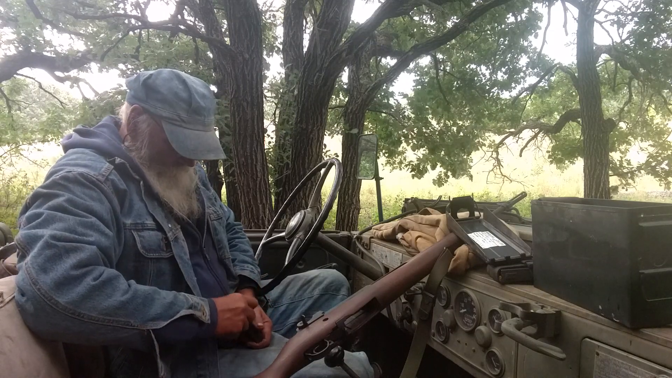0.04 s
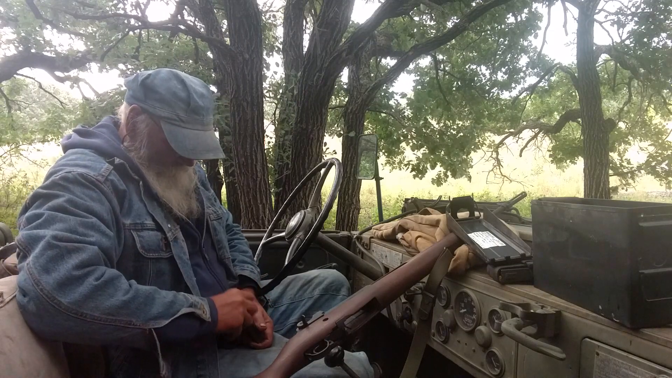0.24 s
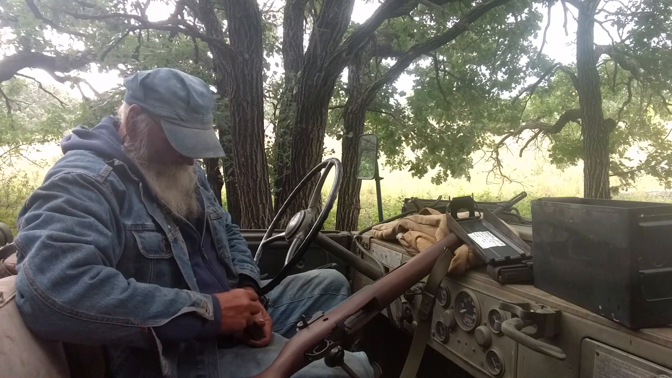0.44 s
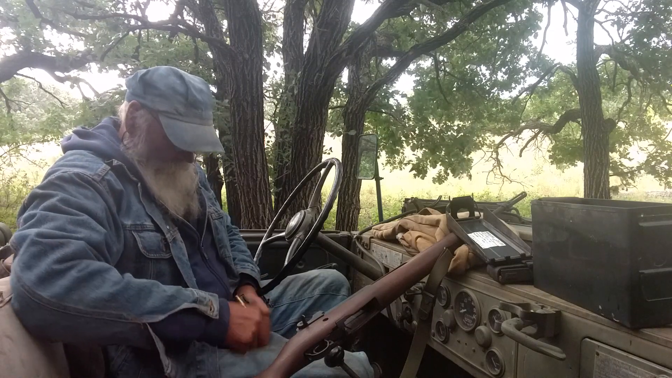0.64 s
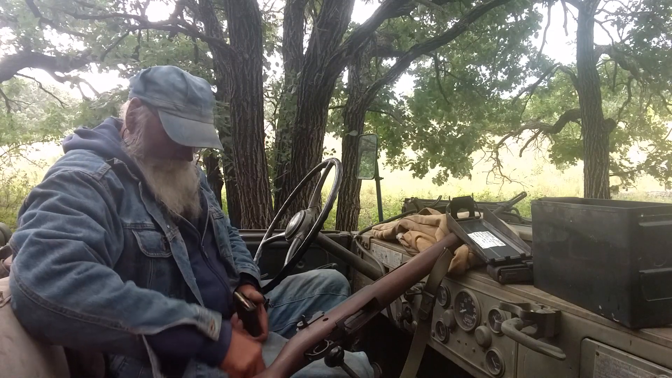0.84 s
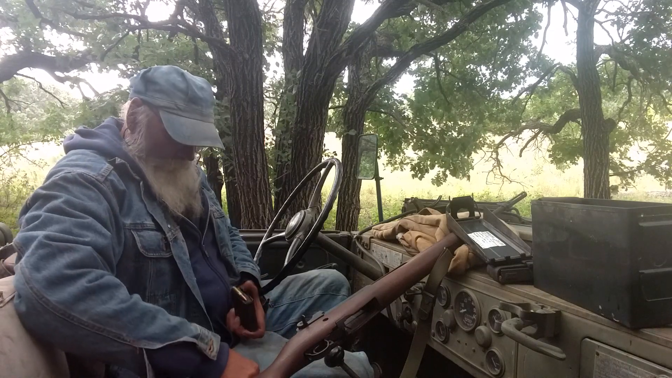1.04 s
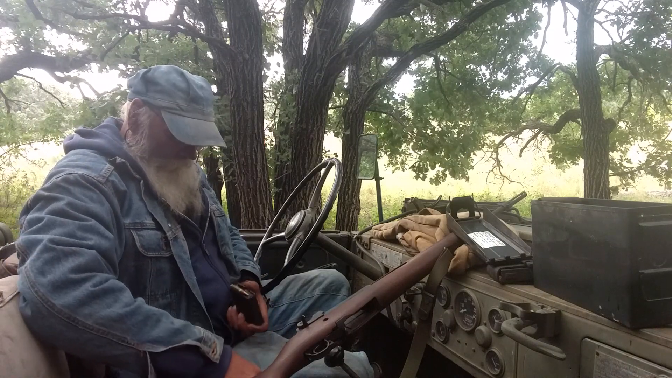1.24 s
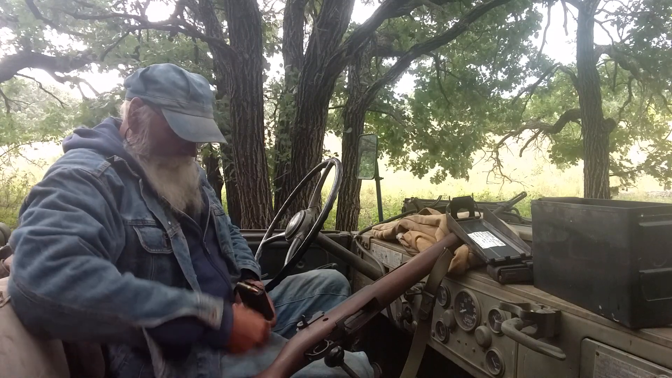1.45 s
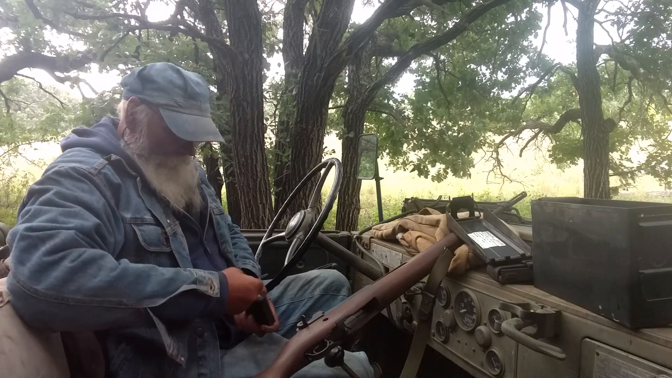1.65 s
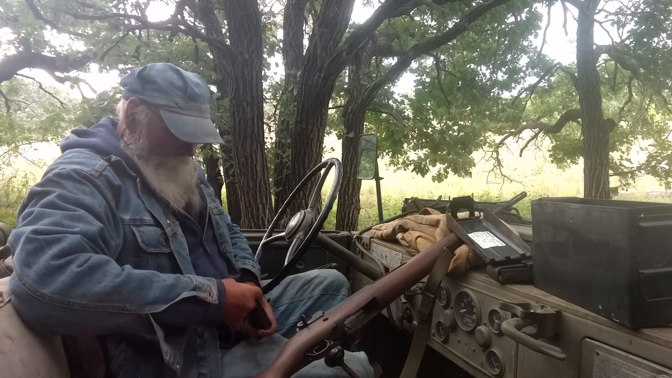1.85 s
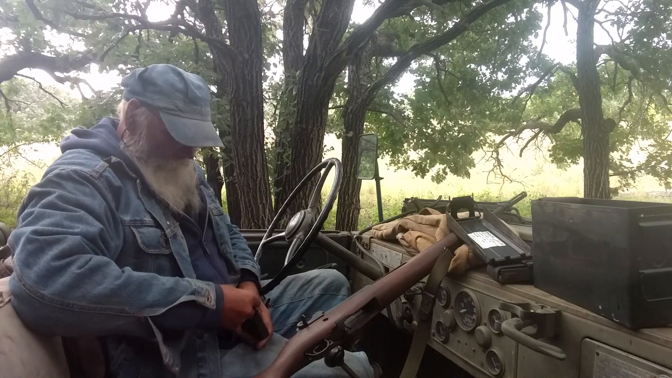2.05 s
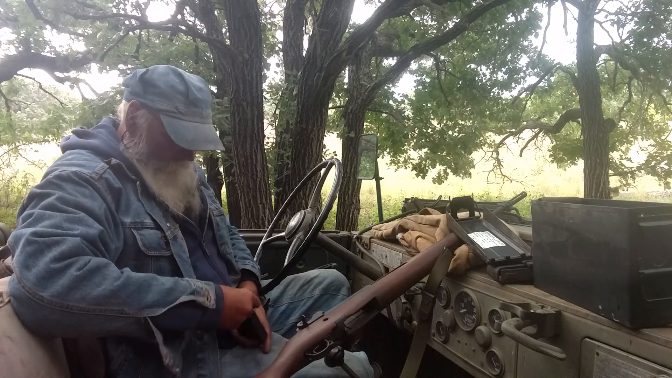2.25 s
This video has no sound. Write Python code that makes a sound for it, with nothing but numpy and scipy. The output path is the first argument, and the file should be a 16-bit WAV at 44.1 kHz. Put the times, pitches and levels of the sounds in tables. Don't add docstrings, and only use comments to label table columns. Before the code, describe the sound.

Cartridge snaps loudly into a steel magazine, then small metallic clicks, over faint outdoor wind hiss

```python
import sys
import numpy as np
from scipy import signal
from scipy.fft import rfft, irfft, next_fast_len
from scipy.io import wavfile
from scipy.ndimage import uniform_filter1d, map_coordinates

SR = 44100
rng = np.random.default_rng(int(sys.argv[2]) if len(sys.argv) > 2 else 0)


def log_audio(samples):
    frames = np.atleast_2d(samples).T
    limited = np.clip(frames, -1, 1)
    pcm = np.round(limited * 32767).astype(np.int16)
    wavfile.write(sys.argv[1], SR, pcm)


def invert_db(level):
    return 10 ** (np.asarray(level, dtype=float) / 20)


N = 101430


def unit(x):
    return x / np.sqrt(np.mean(x ** 2) + 1e-20)


def along(points, hz):
    f, v = np.transpose(points)
    return np.interp(np.log(hz + 1), np.log(f + 1), v)


def wobble(rate):
    knots = rng.standard_normal(int(N * rate / SR) + 4)
    return map_coordinates(knots, [np.arange(N) * rate / SR])


def filtered(x, response):
    n = x.shape[-1]
    m = next_fast_len(n + 8192)
    return irfft(rfft(x, m) * response(np.fft.rfftfreq(m, 1 / SR)), m)[..., :n]


def leaves():
    # frequency in Hz, level in dB.
    mid_tone = [(40, -13), (150, -0.5), (300, -1), (700, -7), (1800, -15.5), (4500, -14), (9000, -22.5),
                (14500, -34.5)]
    side_tone = [(40, -16), (100, -12.5), (300, -10.5), (1000, -14), (2000, -13), (4500, -15), (9000, -22),
                 (14500, -34.5)]
    hiss_top_hz, patchy_db = 15000, 0.52

    def response(hz):
        tone = invert_db(np.array([along(mid_tone, hz), along(side_tone, hz)]))
        return tone / (1 + (hz / hiss_top_hz) ** 40)

    z = signal.stft(rng.standard_normal((2, N)), nperseg=512)[2]
    patches = uniform_filter1d(rng.standard_normal(z.shape[1:]), size=6, axis=0)
    patches = unit(uniform_filter1d(patches, size=14, axis=1))
    pair = signal.istft(z * invert_db(patchy_db * patches), nperseg=512)[1][:, :N]
    mid, side = filtered(pair, response)
    return unit(np.array([mid + side, mid - side]))


def buffeting():
    # frequency in Hz, level in dB.
    rumble_tone = [(25, -16), (60, -13.5), (110, -2), (200, -11), (400, -30)]
    lumpy_db = 3.5
    noise = rng.standard_normal((2, N))
    rumble = filtered(noise, lambda hz: invert_db(along(rumble_tone + [(2000, -120)], hz)))
    lumps = np.array([wobble(8.62), wobble(27)])
    return unit(rumble * invert_db(lumpy_db * lumps))


def wind():
    # time in seconds, level in dB.
    gain_curve = [(0.0, -55.5), (0.15, -52), (0.3, -58), (0.52, -56), (1.2, -50), (1.74, -50.5), (2.3, -50)]
    leaves_db, buffet_db = 6.5, -3
    s, db = np.transpose(gain_curve)
    gain = invert_db(np.interp(np.arange(N) / SR, s, db))
    hiss = leaves()
    return gain * (invert_db(leaves_db) * hiss + invert_db(buffet_db) * buffeting())


def strike(modes, t, force):
    # frequency in Hz, level in dB.
    crack_tone = [(600, 1), (1500, 1.5), (4000, 6), (9000, -3.5), (13500, -15.5), (15000, -16),
                  (16500, -55)]
    sag_per_s, steel_damp_s = 4, 0.012
    crack_t60_s, crack_rise_s = 0.02, 0.0001
    peak_db, rise, finger_damp_s, crack_db, tilt_db = force
    side = np.array([[.5], [-.5]])

    ring = 0
    for hz, level, t60, pan in modes:
        damp_s = finger_damp_s if hz < 1200 else steel_damp_s
        decay = invert_db(level + side * pan - 60 * t / t60) * np.exp(-(t / damp_s) ** 2)
        sag = 1 - sag_per_s * t * (hz < 1000)
        phase = (hz > 1200) * rng.uniform(0, 2 * np.pi)
        ring = ring + decay * np.sin(2 * np.pi * hz * t * sag + phase)

    def crack_response(hz):
        return invert_db(along(crack_tone, hz) + tilt_db * np.log2((hz + 1) / 4000))

    swell = (1 - np.exp(-t / rise)) ** 2
    late = np.maximum(t - rise / 2, 0)
    crack = (1 - np.exp(-late / crack_rise_s)) * invert_db(crack_db - 60 * late / crack_t60_s)
    grit = unit(filtered(rng.standard_normal(t.shape), crack_response))
    return invert_db(peak_db) * (swell * ring + crack * grit)


def cartridges():
    # frequency in Hz, level in dB, t60 in seconds, left-right in dB.
    touch = [(730, -1.5, 0.044, -8), (2380, -8, 0.027, 8), (3580, -10, 0.022, -9)]
    snap = [(1040, 2, 0.071, 6.5), (2040, -35, 0.047, -14), (2910, -17.5, 0.013, 19),
            (3560, -20.5, 0.019, 2), (3817, -20, 0.021, -11), (5120, -17, .014, -18),
            (5860, -15.5, 0.017, -10), (6400, -24.5, 0.017, 2), (8590, -34, 0.017, 11)]
    settle = [(694, 0, 0.038, 0)]
    knock = [(680, 2.5, 0.022, 1), (1185, -21, .03, 0)]
    clink = [(723, -2, .05, 5), (1000, -8, 0.038, -1), (2500, -11, .02, 16), (3390, -6, 0.013, -20),
             (3760, -18, 0.019, 8), (5520, -7, 0.034, 10), (5830, -12, 0.027, -8), (7180, -14, .02, 7),
             (11900, -16, 0.027, -2)]
    brass = [(5550, 7, 0.042, 8), (5800, -3, .05, -2), (3860, -3, .03, -6)]
    press = [(806, 6, 0.023, -4), (710, -9, 0.014, -10), (1260, -9.5, 0.039, 0), (1697, -8, 0.019, -12),
             (2384, -8.5, 0.054, 23), (3280, -8, 0.028, -10.5), (3740, -16.5, 0.032, -9),
             (6900, -39, 0.017, -6), (11850, -15, 0.019, 0)]
    kinds = [touch, snap, settle, knock, clink, brass, brass, press]
    hit_s = [
        .2022,
        .22343,
        .2263,
        .36445,
        1.7588,
        1.7735,
        1.785,
        1.8254,
    ]
    # peak in dB, rise in seconds, time until the fingers damp it in
    # seconds, crack level in dB, crack brightness in dB an octave.
    forces = [
        (-23, 0.00085, 0.0063, -14, 0.5),
        (-1.5, 0.0019, 0.0037, -19, 1.5),
        (-5.5, 0.00034, 0.0035, -20.5, 1),
        (-12, 0.0024, 0.007, -27.5, -2.5),
        (-20.5, 0.00071, 0.011, -2.5, 2.1),
        (-42, .001, 0.0066, -20, 0),
        (-46, .001, .004, -20, 0),
        (-20.5, 0.0012, 0.0065, -9.5, 3),
    ]
    left_lag_s, mic_low_hz = 0.00018, 440
    out = np.zeros((2, N + SR))
    t = np.maximum(np.arange(SR // 20) / SR - np.array([[left_lag_s], [0]]), 0)
    for modes, s, force in zip(kinds, hit_s, forces):
        start = round(s * SR)
        out[:, start:start + t.shape[1]] += strike(modes, t, force)
    return filtered(out[:, :N], lambda hz: 1 / (1 + (mic_low_hz / (hz + 1)) ** 6))


def body(x):
    # frequency in Hz, t60 in seconds.
    decay = [(300, 0.21), (1000, 0.036), (2500, 0.11), (6000, 0.21), (12000, 0.24)]
    # frequency in Hz, level in dB.
    tone = [(500, -8), (1200, 6), (3000, 3.5), (12000, -0.5)]
    hz, t, z = signal.stft(rng.standard_normal((2, SR // 4)), SR, nperseg=128)
    level_db = along(tone, hz)[:, None] - 60 * t / along(decay, hz)[:, None]
    tail = signal.istft(z * invert_db(level_db), SR, nperseg=128)[1]
    tail = tail / np.linalg.norm(tail[0])
    delayed = np.pad(x, ((0, 0), (180, 0)))
    return signal.fftconvolve(delayed, tail, axes=1)[:, :N]


def thumps():
    # time in seconds, peak in dB, pitch in Hz, length in seconds.
    puffs = [
        (1.809, -31, 100, 0.0078),
        (1.863, -30.5, 84, 0.0083),
        (1.8755, -23, 126, 0.0052),
        (2.17, -36, 91, 0.011),
    ]
    t = np.arange(N) / SR
    push = np.zeros(N)
    for s, db, hz, length in puffs:
        swell = np.exp(-((t - s) / length) ** 2)
        push -= invert_db(db) * swell * np.cos(2 * np.pi * hz * (t - s))
    return np.array([0 * t, push])


def scene():
    body_db = -13
    clicks = cartridges()
    return clicks + invert_db(body_db) * body(clicks) + wind() + thumps()


def roll_off(x):
    return signal.sosfilt(signal.butter(12, 16220, fs=SR, output="sos"), x)


def record(dry):
    # frequency in Hz, share of the other side as a ratio.
    cross_share = [(100, 0.77), (1300, 0.77), (2550, 0.81), (5200, 0.6), (10400, 0.37), (15000, 0.46)]
    cross_s = 17.05 / SR

    def response(hz):
        return along(cross_share, hz) * np.exp(-2j * np.pi * hz * cross_s)

    wide = dry - filtered(dry[::-1], response)
    return roll_off(wide)


dry = scene()
out = record(dry)
log_audio(out)
```